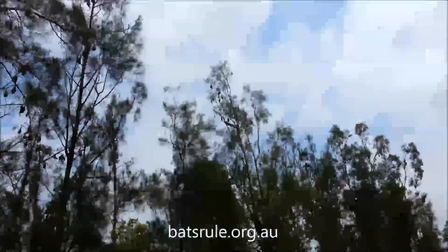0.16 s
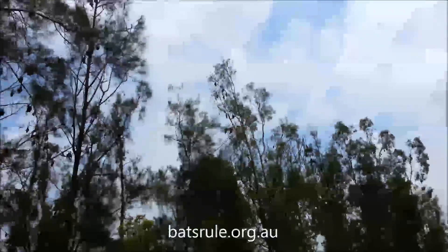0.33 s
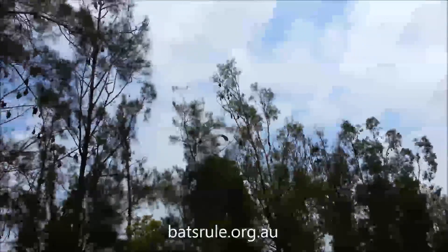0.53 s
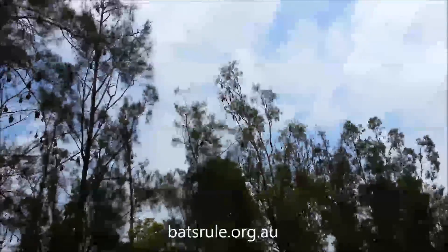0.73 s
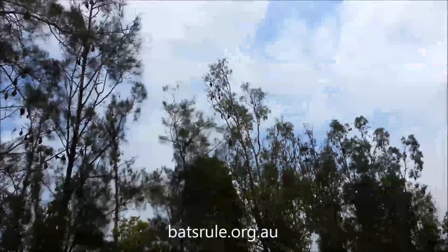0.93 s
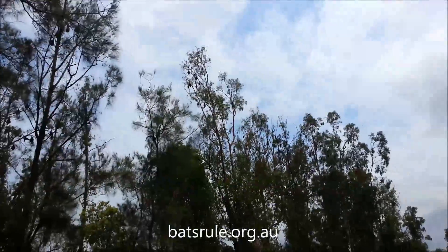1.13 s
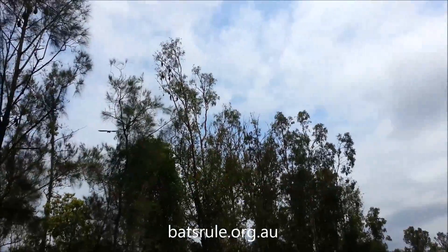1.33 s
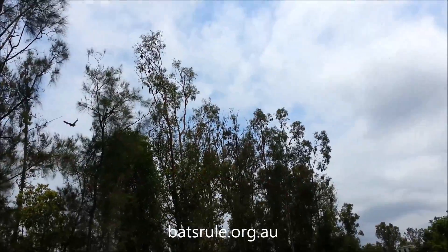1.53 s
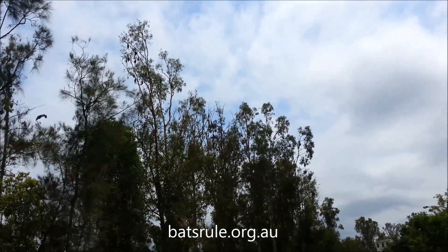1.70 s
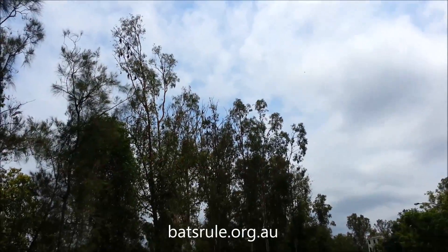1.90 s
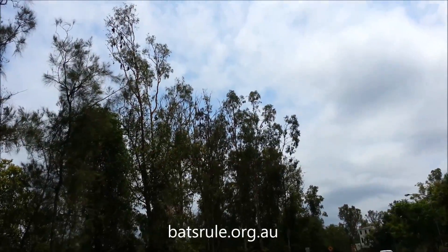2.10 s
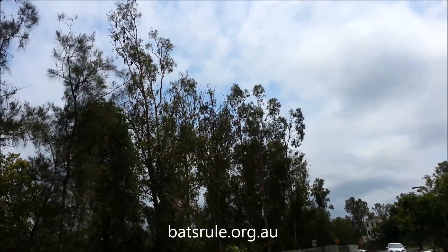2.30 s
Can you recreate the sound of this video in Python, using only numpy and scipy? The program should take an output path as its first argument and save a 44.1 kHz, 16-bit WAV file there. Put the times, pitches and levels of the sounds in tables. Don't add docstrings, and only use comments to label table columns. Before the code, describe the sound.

Fruit bats quarrel in roadside trees: a hoarse hiss, a whistle and fluttering shrill screech, a reedy squeal, then a louder screech and chirps, thinning as traffic swells; small camera microphone outdoors.

```python
import sys
import numpy as np
from scipy import signal
from scipy.io import wavfile
from scipy.ndimage import uniform_filter1d

SR = 44100
rng = np.random.default_rng(int(sys.argv[2]) if len(sys.argv) > 2 else 0)


def master_out(mix):
    frames = np.transpose(np.atleast_2d(mix))
    ceiling = np.clip(frames, -1, 1)
    pcm = np.round(ceiling * 32767).astype(np.int16)
    wavfile.write(sys.argv[1], SR, pcm)


def decibels_to_gain(level_db):
    exponent = np.asarray(level_db, float) / 20
    return 10 ** exponent


N = 103635
T = np.arange(N) / SR


def evened(x):
    return x / np.sqrt(np.mean(x ** 2) + 1e-20)


def read(points, hz):
    f, value = np.transpose(points)
    return np.interp(np.log(hz + 1), np.log(f + 1), value)


def add(mix, start_s, sound, pan_db):
    part = mix[:, max(round(start_s * SR), 0):][:, :len(sound)]
    part += decibels_to_gain(np.array([[pan_db / 2], [-pan_db / 2]])) * sound[:part.shape[1]]


def drift(size, hz):
    b, a = signal.butter(2, min(hz / SR * 2, .9))
    settle = 500
    return evened(signal.lfilter(b, a, rng.standard_normal(size + settle))[settle:])


def turns(hz):
    return 2 * np.pi * np.cumsum(hz) / SR


def fuzzy(hz, width_hz):
    phase = turns(hz)
    in_phase = drift(len(hz), width_hz / 2) * np.cos(phase)
    return in_phase + drift(len(hz), width_hz / 2) * np.sin(phase)


def unroll(table):
    at_s, level_db, pitch_hz = np.transpose(table)
    t = np.arange(at_s[0], at_s[-1], 1 / SR)
    edge = np.clip(np.minimum(t - t[0], t[-1] - t) / 0.0025, 0, 1)
    return t - t[0], edge * decibels_to_gain(np.interp(t, at_s, level_db)), np.interp(t, at_s, pitch_hz)


def swell(length_s):
    return np.sin(np.pi * np.linspace(0, 1, round(length_s * SR))) ** .7


def tone(hz, third_db, rough):
    throb_depth, throb_hz = .45, 70
    t = np.arange(len(hz)) / SR
    phase = turns(hz + 20 * drift(len(t), 120))
    throb = 1 + throb_depth * np.sin(2 * np.pi * (throb_hz * t + rng.random()))
    clear = np.cos(phase) + decibels_to_gain(third_db) * np.cos(3 * phase)
    return evened(throb * ((1 - rough) * clear + rough / 2 * fuzzy(hz, 260)))


def trees(x):
    t60_s, first, spacing, size = .3, 90, 20, SR // 2
    slots = np.arange(first, size, spacing)
    at = slots + rng.integers(0, spacing, (2, len(slots)))
    taps = np.zeros((2, size + spacing))
    np.put_along_axis(taps, at, rng.choice([-1., 1.], at.shape) * decibels_to_gain(-60 * at / SR / t60_s), 1)
    return signal.fftconvolve(x, taps / np.linalg.norm(taps[0]), axes=1)[:, :N]


# f/Hz, likeness/1
EAR_LIKENESS = [(60, 0.2), (130, -0.69), (280, 1), (620, 0.31), (1340, -0.14), (2920, 0.28), (6350, -0.15),
                (13800, 0.35)]
# f/Hz, lean/dB
EAR_LEAN = [(60, 0.0), (110, 1.5), (200, -2.5), (370, -0.5), (670, -1), (1230, -0.5), (2250, 5.5),
            (4120, 4.5), (7550, 1), (13800, -13.5)]


def wash(spectrum, patchy_db):
    frames, hz = N // 256 + 5, np.fft.rfftfreq(1024, 1 / SR)
    a, b, c, d, patches = rng.standard_normal((frames, 513, 5)).T
    patches = evened(uniform_filter1d(uniform_filter1d(patches, size=10, axis=0), size=12, axis=1))
    same = np.clip(read(EAR_LIKENESS, hz), -1, 1)[:, None]
    lean = decibels_to_gain(read(EAR_LEAN, hz)[:, None] / 2)
    left = a + 1j * b
    right = same * left + np.sqrt(1 - same ** 2) * (c + 1j * d)
    z = np.array([left * lean, right / lean])
    ends = (hz > spectrum[0][0]) & (hz < spectrum[-1][0])
    z *= decibels_to_gain(read(spectrum, hz)[:, None] + patchy_db * patches) * ends[:, None]
    return evened(signal.istft(z, nperseg=1024, noverlap=768)[1][:, :N])


# f/Hz, density/dB
ROAD_SPECTRUM = [(35, -79), (60, -18.5), (169, -17.5), (521, -6), (684, -6.5), (944, -5), (1770, -6.5),
                 (2810, -17.5), (3500, -25), (4550, -74), (7700, -120)]
# t/s, level/dB
ROAD_SWELL = [(0.0, -41.5), (0.79, -40), (2.35, -35)]
# f/Hz, width/Hz, level/dB
TYRE_HUMS = [(528.2, 109, -51), (929.3, 123, -49)]


def road():
    hums = np.zeros((2, N))
    for hz, width_hz, db in TYRE_HUMS:
        hums += decibels_to_gain(db + 38) * fuzzy(np.full(N, hz), width_hz)
    return decibels_to_gain(np.interp(T, *np.transpose(ROAD_SWELL))) * (wash(ROAD_SPECTRUM, patchy_db=1.5) + hums)


# f/Hz, density/dB
INSECT_SPECTRUM = [(3300, -11), (3900, -16), (4800, 5), (5700, -3.5), (6900, 0.5), (8500, -14),
                   (10500, -19.5), (14300, -38)]


def insects():
    level_db = -35 + .6 * drift(N, 4)
    return decibels_to_gain(level_db) * wash(INSECT_SPECTRUM, patchy_db=1.8)


# t/s, level/dB
COLONY_LEVEL = [(0.0, -41.5), (0.51, -42.5), (0.67, -38), (.78, -42), (1.0, -37.5), (1.8, -48.5),
                (1.87, -51), (2.35, -59.5)]


def colony():
    count, rate_per_s, low_hz, high_hz, glide_span = 600, 260, 2091, 4246, 0.2393
    mix = np.zeros((2, N))
    for s, pitch, glide, size, side, long in rng.random((count, 6)):
        env = swell(.015 + .04 * long)
        bend = 1 + glide_span * (glide - .5) * np.linspace(-1, 1, len(env))
        hz = (low_hz + (high_hz - low_hz) * pitch) * bend
        squeak = decibels_to_gain(-2.2 * np.log(size + 0.017)) * env * np.cos(turns(hz))
        add(mix, s * count / rate_per_s, squeak, 16 * (side - .5))
    level_db = np.interp(T, *np.transpose(COLONY_LEVEL)) + 5.5
    return decibels_to_gain(level_db) * evened(trees(mix) + 0.68 * mix)


# t/s, length/s, level/dB
INSECT_BUZZES = [
    (.04, .16, -56),
    (1.855, .14, -58),
    (1.28, .07, -62),
    (1.42, .07, -63),
]


def buzzes():
    from_hz, to_hz, width_hz, pan_db = 10600, 12550, 1400, -22.5
    mix = np.zeros((2, N))
    for start_s, length_s, db in INSECT_BUZZES:
        env = swell(length_s)
        add(mix, start_s, decibels_to_gain(db) * env * fuzzy(np.linspace(from_hz, to_hz, len(env)), width_hz), pan_db)
    return mix


# t/s, length/s, level/dB, f/Hz, left-right/dB
FAR_HISSES = [
    (1.33, 0.12, -38, 6500, -1.5),
    (0, .1, -34.5, 2700, -1),
    (.12, 0.26, -44, 7050, 3),
]


def hisses():
    mix = np.zeros((2, N))
    for start_s, length_s, db, hz, pan_db in FAR_HISSES:
        env = swell(length_s)
        add(mix, start_s, decibels_to_gain(db) * env * fuzzy(np.full(len(env), hz), 0.46 * hz), pan_db)
    return mix


# t/s, length/s, level/dB, f/Hz, left-right/dB
SMALL_PEEPS = [(.9, .03, -42, 6400, 0), (1.115, .045, -41, 6600, 4), (1.345, .022, -30, 5250, -3),
               (1.39, .02, -40, 4300, 6), (.705, .045, -33, 2600, 5), (2.008, .02, -41, 3200, 0),
               (1.45, .015, -39, 3300, 0), (1.325, .02, -38, 3250, 0), (2.25, .02, -46, 3400, 0),
               (.98, .015, -33, 2950, -8), (1.31, .03, -41, 3150, -6)]


def peeps():
    mix = np.zeros((2, N))
    for start_s, length_s, db, hz, pan_db in SMALL_PEEPS:
        env = swell(length_s)
        add(mix, start_s, decibels_to_gain(db) * env * tone(np.full(len(env), hz), -60, 0.12), pan_db)
    return mix


# t/s, length/s, level/dB, start f/Hz, end f/Hz, hoarseness/1
SHORT_CHIRPS = [(.15, .055, -32, 2450, 2350, .15), (.335, .035, -27, 2150, 2150, .2),
                (.385, .04, -26, 2130, 1940, .1), (.64, .03, -28, 2900, 2870, .2),
                (.878, .025, -32, 2250, 2200, .5), (.925, .035, -39, 2300, 2380, .5),
                (1.055, .04, -36, 2350, 2330, .5), (1.113, .04, -27, 2270, 2250, .2),
                (1.205, .045, -26, 2240, 2170, .45), (1.272, .03, -31, 2200, 2300, .6),
                (1.345, .05, -36, 2450, 2350, .8), (1.4, .062, -28, 2320, 2150, .55),
                (1.465, .04, -33, 2200, 2300, .6), (.475, .04, -27, 2380, 2780, .3),
                (1.655, .06, -35, 2150, 2500, .1), (1.18, .025, -35, 2000, 2150, .5),
                (1.53, .03, -37, 2300, 2350, .5), (.548, .03, -31, 2650, 2750, .4)]


def chirps():
    mix = np.zeros((2, N))
    for start_s, length_s, db, from_hz, to_hz, rough in SHORT_CHIRPS:
        env = swell(length_s)
        hz = np.linspace(from_hz, to_hz, len(env))
        add(mix, start_s, decibels_to_gain(db) * env * tone(hz, third_db=-24, rough=np.clip(rough, 0, 1)), .6)
    return mix


# t/s, level/dB, f/Hz
WHISTLE_CONTOUR = [(.205, -38, 3200), (.235, -30, 2970), (.3, -26, 2980), (.34, -29, 2900),
                   (.46, -23, 2876), (.48, -32, 2870), (.53, -33, 2950)]


def whistle():
    t, gain, hz = unroll(WHISTLE_CONTOUR)
    return gain * tone(hz, third_db=-50, rough=.35)


# t/s, effort/dB, f/Hz
SQUEAL_CONTOUR = [(.475, -45, 610), (.505, -30, 728), (.55, -27, 783), (.585, -25, 765), (.625, -24, 788),
                  (.645, -28, 732), (.67, -28, 730), (.7, -26, 686), (.755, -36, 635)]
# f/Hz, gain/dB
MOUTH = [(1500, -74.5), (2600, 6), (3500, 4), (4600, 5), (5500, 11), (6300, -3), (10000, -11.5),
         (13000, -23)]


def squeal():
    roughness, rough_hz, flicker_db, flicker_hz = .16, 410, 2.2, 27
    t, gain, hz = unroll(SQUEAL_CONTOUR)
    hz = hz * (1 + 0.0084 * drift(len(t), 82))
    phase = turns(hz)
    stack = np.zeros(len(t))
    for k in range(2, 17):
        level = decibels_to_gain(read(MOUTH, k * hz) + flicker_db * drift(len(t), flicker_hz))
        stack += level * (np.cos(k * phase) + roughness * k / 3 * fuzzy(k * hz, rough_hz))
    return gain * evened(stack)


# t/s, peak level/dB
FLUTTER_BURSTS = [(0.3046, -12.9), (0.3102, -14.1), (0.3227, -14.4), (0.3303, -11.8), (0.3399, -13.0),
                  (0.3499, -11.1), (0.3609, -15.1), (0.3681, -14.9), (0.3798, -14.7), (0.3947, -16.1),
                  (0.4039, -18.1), (0.4133, -16.1), (0.4231, -18.5), (0.4321, -15.6), (0.4431, -16.4),
                  (0.4503, -15.1), (0.4637, -19.0), (0.4697, -20.4), (0.482, -16.9), (0.4897, -21.1),
                  (0.496, -27.5), (0.5019, -20.4), (0.5122, -19.8), (0.5216, -18.3), (0.5324, -22.5),
                  (0.5408, -16.1), (0.551, -17.7), (0.5618, -16.4), (0.5719, -14.9), (0.5786, -16.2),
                  (0.5885, -17.6), (0.5942, -17.1), (0.9656, -21.7), (0.9722, -21.0), (0.9844, -12.3),
                  (0.993, -11.5), (1.0007, -12.3), (1.0117, -8.7), (1.0215, -13.2), (1.0347, -18.0),
                  (1.0426, -14.8), (1.0526, -14.5), (1.0648, -15.6), (1.0759, -16.1), (1.0872, -21.9),
                  (1.0997, -21.3), (1.1062, -24.0), (1.1185, -20.9), (1.13, -20.9), (1.1434, -25.2),
                  (1.1549, -25.2), (1.1606, -27.5), (1.173, -29.2), (1.1851, -33.6), (1.1935, -35.9)]


def screech(table, rasp_width_hz, rasp_share):
    scoop_s, scoop_db, between_db = .028, -6, -10
    burst_s, burst_gain_db = .0021, -3.5
    overtone_db, air_db = -24, -14
    t, gain, hz = unroll(table)
    wobble = .022 * np.clip(t / scoop_s - .7, .15, 1) * drift(len(t), 220)
    hz = uniform_filter1d(hz, size=100) * (1 + wobble)
    bursts = np.zeros(len(t))
    for s, db in FLUTTER_BURSTS:
        bursts += decibels_to_gain(db + burst_gain_db) * np.exp(-((t + table[0][0] - s) / burst_s) ** 2 / 2)
    chop = np.clip(t / scoop_s - .9, 0, .5) * 2
    rasp = rasp_share * (.5 + chop / 2)
    clear = np.sqrt(2) * np.cos(turns(hz))
    voice = (1 - rasp) * clear + rasp * fuzzy(1.03 * hz, rasp_width_hz)
    voice = voice / np.hypot(1 - rasp, rasp)
    haze = chop * (decibels_to_gain(overtone_db) * fuzzy(2 * hz, 3400) + decibels_to_gain(air_db) * fuzzy(1.3 * hz, 5400))
    held = gain * decibels_to_gain(scoop_db + chop * (between_db - scoop_db))
    return (held + bursts) * voice + (gain + 0.29 * bursts) * haze


# t/s, effort/dB, f/Hz
SCREECH_CONTOURS = [
    [(.27, -21, 2197), (.291, -14, 2930), (.298, -14.5, 3880), (.345, -17, 3970), (.385, -19.5, 3725),
     (.52, -24, 3720), (.59, -19, 3650), (.615, -17, 2850), (.63, -28, 2650)],
    [(.94, -22, 2530), (.961, -11, 3050), (.968, -19, 3602), (1.01, -13.5, 3680), (1.03, -19, 3476),
     (1.09, -26, 3459), (1.13, -25.5, 3500), (1.165, -26, 3200), (1.195, -28, 2840)],
    [(1.19, -32, 3050), (1.24, -26, 3332), (1.3, -38, 3063)],
]
# width/Hz, share/1
SCREECH_RASPS = [(800, .4), (650, .36), (500, .6)]


def calls():
    mix = np.zeros((2, N))
    for table, rasp in zip(SCREECH_CONTOURS, SCREECH_RASPS):
        add(mix, table[0][0], screech(table, *rasp), 5.5)
    add(mix, SQUEAL_CONTOUR[0][0], squeal(), 3)
    add(mix, WHISTLE_CONTOUR[0][0], whistle(), -1.5)
    return mix + chirps() + peeps() + hisses()


def scene():
    treble_hz, treble_pan_db, port_lag_s, trees_db = 7340, -19.5, -.00027, -9
    near = signal.sosfilt(signal.butter(6, [1600, 11500], "band", fs=SR, output="sos"), calls())
    treble = signal.sosfiltfilt(signal.butter(3, treble_hz, "high", fs=SR, output="sos"), near)
    near = near + treble * (decibels_to_gain(np.array([[.5], [-.5]]) * treble_pan_db) - 1)
    near[1] = np.roll(near[1], round(port_lag_s * SR))
    swarm = insects()
    return near + decibels_to_gain(trees_db) * trees(near) + colony() + buzzes() + road() + swarm


def roll_off(x):
    return signal.sosfilt(signal.butter(12, 14410, fs=SR, output="sos"), x)


# f/Hz, level/dB
GATE_FLOOR = [(60, -69), (150, -81), (260, -110), (8800, -110), (10000, -87), (14000, -88)]


def record(dry):
    gate_rise, scatter_db = 0.33, 3.0
    x = signal.sosfilt(signal.butter(2, 110, "high", fs=SR, output="sos"), dry)
    hz, t, z = signal.stft(x, SR, nperseg=2048, noverlap=1024)
    power = abs(z) ** 2 + 1e-16
    wide = uniform_filter1d(power, size=16, axis=1)
    narrow = uniform_filter1d(power, size=2, axis=1)
    band_db = 10 * np.log10(abs(np.where(hz[:, None] > 2000, wide, narrow)) + 1e-16)
    loud_db = 10 * np.log10(power.sum((0, 1)))
    over_db = band_db - read(GATE_FLOOR, hz)[:, None] - gate_rise * (loud_db - loud_db.min())
    scatter = np.repeat(rng.standard_normal((2, 129, len(t))), 8, axis=1)[:, :len(hz)]
    over_db += scatter_db * scatter
    gated = signal.istft(z * np.clip(over_db, 0, 1), SR, nperseg=2048, noverlap=1024)[1][:, :N]
    return roll_off(gated)


dry = scene()
out = record(dry)
master_out(out)
```